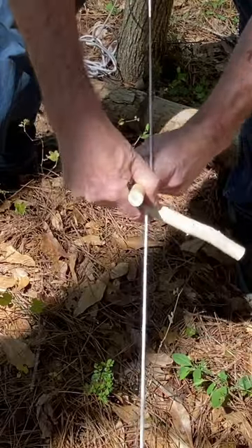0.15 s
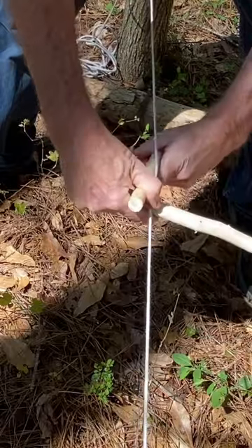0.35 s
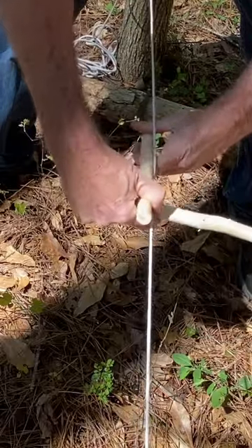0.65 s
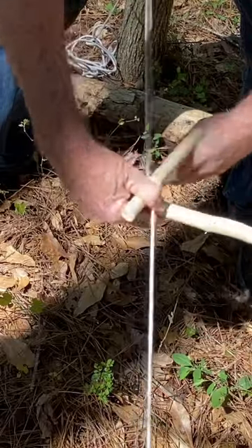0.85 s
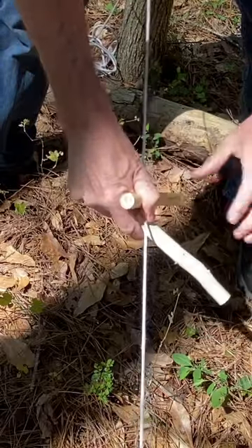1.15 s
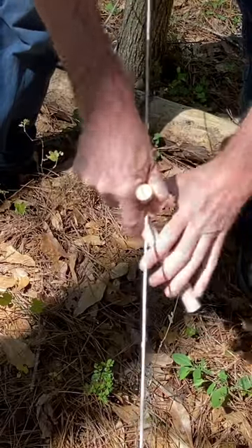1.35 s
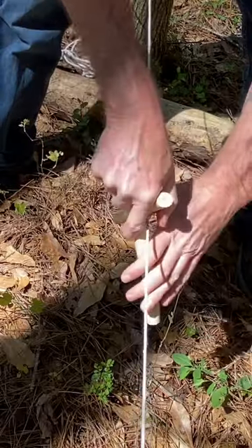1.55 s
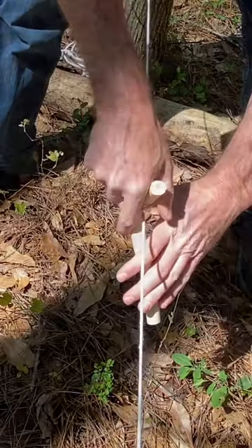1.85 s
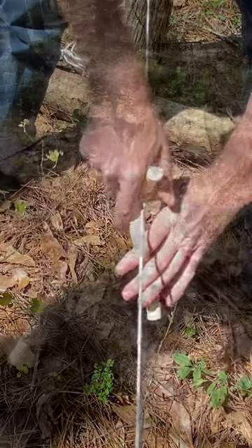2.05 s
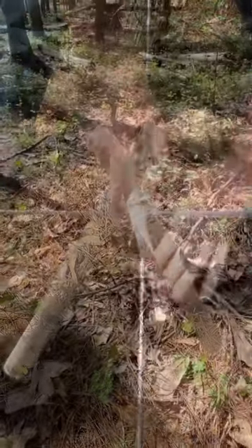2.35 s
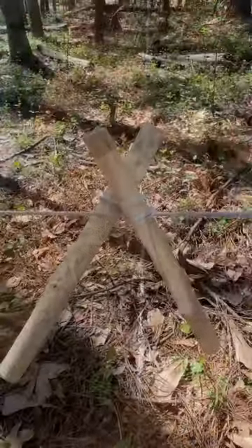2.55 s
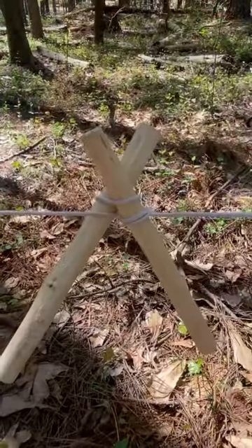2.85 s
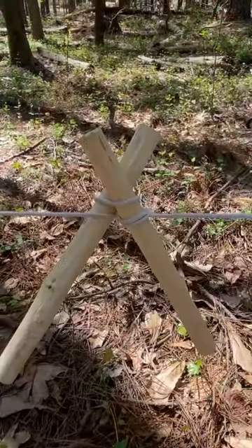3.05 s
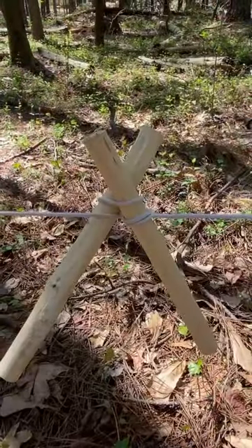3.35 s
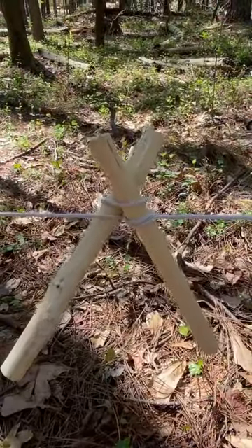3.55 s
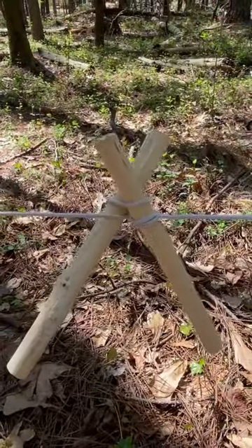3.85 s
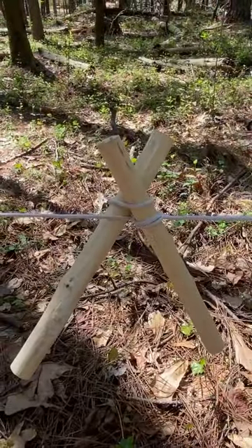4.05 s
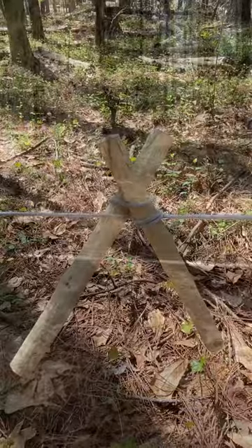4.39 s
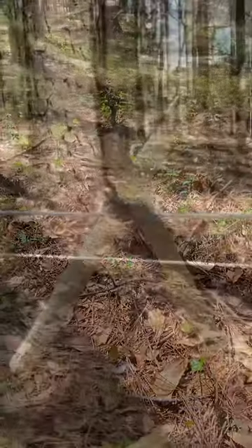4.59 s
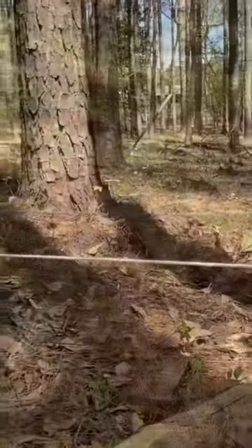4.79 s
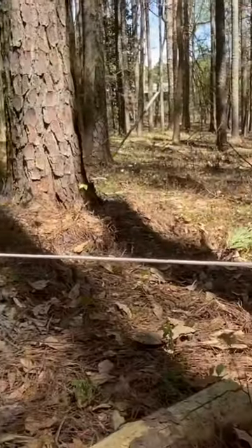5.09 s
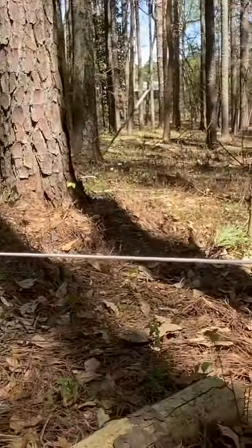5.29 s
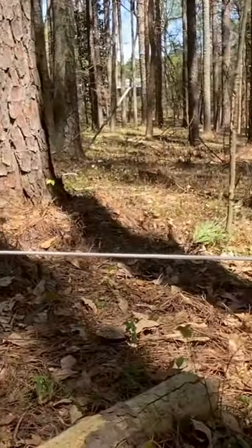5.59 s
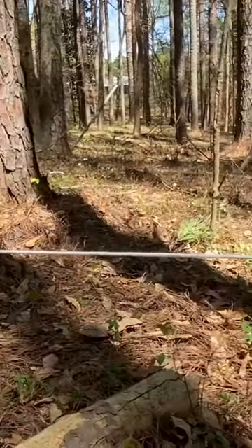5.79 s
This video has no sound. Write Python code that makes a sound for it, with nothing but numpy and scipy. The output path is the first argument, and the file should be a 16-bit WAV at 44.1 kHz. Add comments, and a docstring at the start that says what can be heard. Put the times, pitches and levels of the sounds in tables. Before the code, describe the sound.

A wooden toggle knocks sharply once on a taut rope in quiet pine woods while an engine hum fades and birds trill and chip.

```python
"""A quiet pine wood, heard by two spaced microphones: close by, hands work a wooden toggle on a taut rope.
The sticks knock sharply once, among lighter contacts: decaying wood modes plus a noise crack.
A distant engine, two sagging tones, fades into a low rumble; dry leaves tick and rustle as shaped noise.
One bird to the right sings a quick rolling phrase, another gives thin rising chips, others call deeper in.
Birds are gliding sine notes; the trunks scatter them as separate echoes and a diffuse tail."""
import sys
import numpy as np
from scipy import signal
from scipy.fft import rfft, irfft, next_fast_len
from scipy.io import wavfile
from scipy.ndimage import map_coordinates

SR = 44100
rng = np.random.default_rng(int(sys.argv[2]) if len(sys.argv) > 2 else 0)


def output_pcm(signal):
    """Save a mono or channel-first signal as 16-bit PCM at the path in sys.argv[1].

    Samples are clipped to [-1, 1] before scaling.
    """
    pcm = np.clip(np.atleast_2d(signal).T, -1, 1) * 32767
    wavfile.write(sys.argv[1], SR, np.round(pcm).astype(np.int16))


N = 261405

# Slow level shared by the rush of the wood and the rumble under it: (time [s], level [dB])
AIR_LEVEL = [(0.0, -58), (0.79, -59.5), (1.75, -57.5), (2.36, -66.5), (2.61, -67), (3.02, -66.5),
             (4.39, -69), (5.18, -62), (5.93, -62)]
# Noise spectra, relative density: (frequency [Hz], level [dB])
RUMBLE_SPECTRUM = [(20, -49), (32, -13.5), (46, -0.5), (60, 5.5), (80, 1), (105, -4.5), (135, -9),
                   (165, -17), (240, -25), (400, -34.5), (800, -70)]
RUSH_SPECTRUM = [(100, 0.5), (250, -3), (400, -3.5), (600, 0.5), (870, 5.5), (1200, 2), (1600, -6),
                 (2200, -14), (3200, -23), (5000, -39), (12000, -100)]
LEAF_SPECTRUM = [(800, -8), (2200, -17), (4500, 7.5), (8000, 3.5), (9300, -2), (12000, 0), (13200, -54),
                 (16000, -62)]
ROPE_SPECTRUM = [(500, 0), (2000, 6), (5000, -4.5), (7700, 4.5), (9200, -11.5), (11000, 4.5), (13000, -14),
                 (15000, -7), (16500, -33)]
TWIG_SPECTRUM = [(300, -58.5), (1200, 1), (2500, 13.5), (4300, 12), (6000, 11.5), (7800, 14.5),
                 (11000, 8.5), (16000, -55)]
# Likeness of the two microphones in diffuse sound: (frequency [Hz], correlation [-1 to 1])
MIC_LIKENESS = [(90, 0.93), (200, 0.52), (320, 0.22), (500, -0.18), (900, -0.31), (1400, -0.4),
                (2200, 0.16), (7000, 0.16)]
# Decay among the trunks: (frequency [Hz], time to fall 60 dB [s])
TRUNK_DECAY = [(500, 0.23), (2600, 1), (4500, 0.64), (7500, 0.47), (12000, 0.25)]
# Dry leaves pressed on the ground: (time [s], bell width [s], relative level [dB])
RUSTLES = [(2.42, 0.44, -75.5), (3.13, 0.078, -76), (3.68, 0.18, -78.5), (5.18, 0.25, -76.5),
           (5.8, 0.36, -77.5)]
# The engine's tones: (pitch at the start [Hz], relative level [dB], brief swells and dips),
# the last a list of (time [s], bell width [s], change [dB])
ENGINE_TONES = [(82.2, -39, [(.08, 0.51, 3.5), (.55, .25, -10), (1.65, 0.15, 5)]),
                (131.5, -40, [(.36, .15, -5), (1.563, 0.12, -17)])]
# Whistles deeper in the wood, before the loss over distance:
# (time [s], length [s], start [Hz], middle [Hz], end [Hz], level [dB])
FAR_CALLS = [(.53, .36, 2610, 2610, 2600, -73), (.9, .62, 2600, 2590, 2580, -68),
             (.915, .035, 3100, 3600, 4300, -71), (1.19, .032, 3100, 3750, 4600, -73),
             (2.55, .15, 5900, 5800, 5750, -78), (3.23, .115, 3300, 2730, 2480, -75.5),
             (3.755, .115, 3300, 2730, 2480, -78), (3.772, .07, 2030, 1930, 1850, -71)]
# Chips: (time [s], length [s], relative level [dB], left over right [dB])
CHIPS = [(2.492, 0.045, -59, 6), (3.351, .052, -54, 6), (3.754, 0.063, -60.5, 1), (4.274, 0.051, -61, 11),
         (4.849, 0.031, -68, 13), (5.41, 0.041, -56.5, 16)]
# Pitch of a chip, before small random bends: (start [Hz], middle [Hz], end [Hz])
CHIP_PITCHES = (6150, 7480, 8150)
# Syllables of the rolling phrase, before small random bends: (time into the phrase [s], length [s],
# start [Hz], middle [Hz], end [Hz], relative level [dB], loss by the end of the song [dB])
PHRASE = [(-.028, .009, 4100, 5010, 6000, -14.5, 19), (.001, .027, 5246, 3750, 2640, -5.5, 24.5),
          (0.072, .027, 1757, 1980, 2330, -19, 6.5), (.106, .036, 2934, 3054, 3780, -4, 24.5),
          (.177, 0.067, 2285, 2505, 2590, -10, 25.5)]
# Clearest ticks of twigs, rope and dry leaves:
# (time [s], relative level [dB], left over right [dB], tilt [dB per octave])
TICKS = [(0.036, -35, 3, -5.5), (0.3765, -37, 4.5, -3), (0.44, -44.5, -0.5, 48), (.511, -47, 5, -2),
         (2.401, -50.5, -14, 34), (2.492, -45.5, -4, 23), (2.7663, -46.5, 0, 1), (3.123, -41.5, -1, 2.5),
         (3.712, -42.5, -1, -0.5), (4.005, -49.5, 4, -2), (4.218, -60, 6, 6), (4.566, -44.5, 0, -7.5),
         (5.1272, -43, 3, -6), (5.159, -40.5, -1, -9.5), (5.237, -40.5, 4, -10.5), (5.439, -47, -3, -8),
         (5.7153, -45, 15, -1), (5.829, -52, 15, -5.5)]
# Rope sliding through the hands: (time [s], bell width [s], relative level [dB])
SLIDES = [(.167, 0.037, -58.5), (.2, 0.088, -63.5), (.6, 0.096, -68.5), (.796, 0.029, -49),
          (.964, .027, -61.5), (1.304, 0.041, -71), (1.45, 0.049, -70), (1.705, .015, -67)]
# Stick against stick: (time [s], relative peak level [dB], low-pass cutoff [Hz])
KNOCKS = [(0.1877, -36.5, 700), (0.7856, -22, 7500), (0.7915, -34, 2500), (0.7963, -32.5, 9000),
          (0.7996, -25, 8100), (0.8105, -29.5, 1000), (1.0835, -34.5, 2840), (4.686, -63, 920)]
# The sticks' modes: (frequency [Hz], relative level [dB], time to fall 60 dB [s])
WOOD_MODES = [(290, -8, 0.028), (440, -1, 0.014), (886, -5, 0.0098), (1216, -4, 0.078), (1354, 6.5, 0.024),
              (1722, 6, 0.017), (2580, -11, 0.036), (2930, 3.5, 0.016), (3850, 0, 0.016),
              (4920, 17.5, 0.0013), (5260, 0.5, 0.007), (7600, -7, 0.025)]

TOP_HZ = 15900
RUSH_DB = 5  # over the shared air level
RUMBLE_DB, RUMBLE_FOLLOWS = -50, 0.94  # mean level, and the share of the slow swing that it follows
HISS_DB = -85  # leaves at rest
# the engine slows ever faster (share of its speed per s squared) and recedes; from GONE_S on it fades quickly
SLOWING, RECEDE_DB_PER_S, GONE_S, GONE_DB_PER_S = 0.01236, 5.5, 2.275, 35.5
# every bird note swells and sinks: its peak (share of its length), start and end below the peak (dB)
NOTE_PEAK, NOTE_START_DB, NOTE_END_DB = 0.34, -2, -6.5
CHIP_START_DB = -15.5  # a chip begins more softly than other notes
QUAVER = .012  # quick unsteadiness of a bird's pitch (share)
PHRASE_S = .2912  # from one phrase to the next
WARM_UP_DB = 12.5  # a song starts soft, by this much
NEAR_SONG_S, NEAR_SONG_DB, NEAR_LENGTH_S, NEAR_WARM_UP_S = 1.218, -41.5, 1.52, 0.088
FAR_SONG_S, FAR_SONG_DB, FAR_LENGTH_S, FAR_WARM_UP_S = 4.205, -60, 1.6, .36
REBOUND_S, REBOUND_DB = 0.0041, -9  # each knock touches once more, softly


def amp(db):
    """Decibels to gain."""
    return 10 ** (np.asarray(db) / 20)


def unit(x):
    """Scale to rms 1."""
    return x / np.sqrt(np.mean(x ** 2) + 1e-20)


def along(points, hz):
    """Read (frequency [Hz], value) points on a log frequency axis."""
    f, v = np.transpose(points)
    return np.interp(np.log(hz + 1), np.log(f + 1), v)


def curves(rows):
    """One value per sample for each column after the time."""
    s, *cols = np.transpose(rows)
    return [np.interp(np.arange(N) / SR, s, c) for c in cols]


def wobble(rate, count=N):
    """A smooth random curve, rate knots a second."""
    knots = rng.standard_normal(int(count * rate / SR) + 4)
    return map_coordinates(knots, [np.arange(count) * rate / SR])


def bell(s, length):
    """A smooth rise to 1 and back around time s."""
    return np.exp(-2 * ((np.arange(N) / SR - s) / length) ** 2)


def swells(rows):
    """Bell-shaped rises of level from (time [s], bell width [s], level [dB]) rows."""
    return sum(amp(db) * bell(s, length) for s, length, db in rows)


def filtered(x, response):
    """Shape x by a response of frequency."""
    n = x.shape[-1]
    m = next_fast_len(n + SR // 4)
    hz = np.fft.rfftfreq(m, 1 / SR)
    return irfft(rfft(x, m) * response(hz), m)[..., :n]


def pan(db):
    """Left and right gains for a level difference, left over right."""
    return amp(np.array([[db], [-db]]) / 2)


def add(track, s, sound):
    """Mix a sound into a track at time s."""
    part = track[..., max(0, round(s * SR)):][..., :sound.shape[-1]]
    part += sound[..., :part.shape[-1]]


def noise(spectrum, count=N):
    """Diffuse stereo noise of rms 1, as two spaced microphones hear it."""
    def mid_side_gains(hz):
        turn = np.arccos(np.clip(along(MIC_LIKENESS, hz), -1, 1)) / 2
        return amp(along(spectrum, hz)) * [np.cos(turn), np.sin(turn)]

    mid, side = filtered(rng.standard_normal((2, count)), mid_side_gains)
    return unit(np.array([mid + side, mid - side]))


def arrive(x, lead):
    """Direct sound that reaches the left microphone lead seconds before the right."""
    sides = np.array([[1], [-1]])
    return filtered(x, lambda hz: np.exp(1j * np.pi * hz * lead * sides))


def near_trunks(x, echo_db, count=5):
    """A few separate echoes from the nearest trees, at other delays for each microphone."""
    out = np.zeros((2, N))
    for side in out:
        for delay in rng.uniform(0.006, 0.021, count):
            add(side, delay, amp(echo_db) * x)
    return out


def forest(x, wet_db, build=0.0009):
    """The trunks' diffuse answer: decaying noise, different at each microphone, building over build seconds."""
    hz, t, z = signal.stft(rng.standard_normal((2, SR)), SR, nperseg=256)
    decay = amp(-60 * t / along(TRUNK_DECAY, hz)[:, None])
    onset = 1 - np.exp(-t / build)
    tail = signal.istft(z * decay * onset, SR, nperseg=256)[1]
    tail = tail / np.linalg.norm(tail[0])
    return amp(wet_db) * signal.fftconvolve(x[None], tail, axes=1)[:, :N]


def background():
    """Far rumble, the soft rush of the wood and a faint crackling hiss of leaves, all shaped noise."""
    air_db, = curves(AIR_LEVEL)
    rumble_db = RUMBLE_DB + RUMBLE_FOLLOWS * (air_db - air_db.mean()) + 0.82 * wobble(9)
    rumble = amp(rumble_db) * noise(RUMBLE_SPECTRUM) * pan(4.4)
    rush = amp(air_db + RUSH_DB + 1.0 * wobble(7)) * noise(RUSH_SPECTRUM) * pan(0.8)
    hiss = amp(HISS_DB + 1.4 * wobble(25) + 2.9 * wobble(350)) * noise(LEAF_SPECTRUM)
    return rumble + rush + hiss


def engine(waver_db=2):
    """Two low tones that sag and fade together, wavering on their long way through the wood."""
    tones, t = np.zeros(N), np.arange(N) / SR
    speed = 1 - SLOWING * t ** 2
    fade_db = RECEDE_DB_PER_S * t + GONE_DB_PER_S * np.maximum(t - GONE_S, 0)
    for hz, db, changes in ENGINE_TONES:
        swell_db = sum(change_db * bell(s, length) for s, length, change_db in changes)
        phase = 2 * np.pi * np.cumsum(hz * speed) / SR + 0.6 * wobble(14)
        level = db - fade_db + swell_db + waver_db * wobble(10.7)
        tones += np.sqrt(2) * amp(level) * np.sin(phase)
    return arrive(tones, lead=.0004) * pan(2)


def litter(count=170, spread_db=4, life=0.00077):
    """Dry leaves and needles settle in many faint decaying snaps, louder where they are pressed."""
    stir = amp(HISS_DB) + swells(RUSTLES)
    snaps = np.zeros(N)
    at = rng.integers(0, N, count)
    extra_db = np.minimum(spread_db * rng.standard_exponential(count), 12)
    snaps[at] = stir[at] * amp(extra_db)
    bursts = signal.lfilter([1], [1, -np.exp(-1 / (life * SR))], snaps)
    return amp(5.5) * bursts * noise(TWIG_SPECTRUM)


def rustle():
    """Dry leaves crushed briefly: noise with a fast uneven level gives a grainy crackle."""
    grain = unit(amp(2.9 * wobble(300)))
    return swells(RUSTLES) * grain * noise(LEAF_SPECTRUM)


def add_whistle(track, s, length, pitches_hz, db, quaver=0, start_db=NOTE_START_DB, edge=0.00074):
    """A pure note that glides through its start, middle and end pitch as it swells and sinks."""
    u = np.linspace(0, 1, max(3, round(length * SR)))
    glide = np.polyfit([0, .5, 1], pitches_hz, 2)
    hz = np.polyval(glide, u) * (1 + quaver * wobble(219, count=len(u)))
    level = db + np.interp(u, [0, NOTE_PEAK, 1], [start_db, 0, NOTE_END_DB])
    ends = np.clip(np.minimum(u, 1 - u) * length / edge, 0, 1)
    add(track, s, ends * amp(level) * np.sin(2 * np.pi * np.cumsum(hz) / SR))


def sing(start, db, song_s, warm_up_s, waver=0.008):
    """One phrase repeated, never quite alike, under one arch of loudness."""
    voice = np.zeros(N)
    for phrase_s in np.arange(0, song_s, PHRASE_S):
        for offset, length, *pitches_hz, level, tiring_db in PHRASE:
            bend = 1 + waver * rng.standard_normal(len(pitches_hz))
            age = phrase_s + offset
            warm_up_db = -WARM_UP_DB * np.exp(-age / warm_up_s)
            effort_db = warm_up_db - tiring_db * (age / song_s) ** 4
            if age < song_s:
                add_whistle(voice, start + age, length, bend * pitches_hz, db + level + effort_db, QUAVER)
    return voice * amp(3 * wobble(260))


def far_birds(dull_hz=3300):
    """Distant whistles and a second singer, mostly echo, whose top notes are lost among the trees."""
    calls = np.zeros(N)
    for s, length, *pitches_hz, db in FAR_CALLS:
        add_whistle(calls, s, length, pitches_hz, db)
    calls = calls * amp(3.2 * wobble(70))
    song = sing(FAR_SONG_S, FAR_SONG_DB, FAR_LENGTH_S, FAR_WARM_UP_S)
    singer = filtered(song, lambda hz: 1 / np.sqrt(1 + (hz / dull_hz) ** 8))
    direct = amp(-3) * calls + amp(-7) * singer
    echoes = near_trunks(singer, echo_db=-11)
    return direct + echoes + forest(calls, wet_db=-4) + forest(singer, wet_db=-1.5, build=0.014)


def chipping_bird(waver=0.0072):
    """Thin upward flicks of pitch with a slightly hoarse flutter of level."""
    out, voice = np.zeros((2, N)), np.zeros(N)
    flutter = amp(2.4 * wobble(380))
    for s, length, db, side_db in CHIPS:
        note = np.zeros(N)
        pitches_hz = CHIP_PITCHES * (1 + waver * rng.standard_normal(len(CHIP_PITCHES)))
        add_whistle(note, s, length, pitches_hz, db, QUAVER / 2, CHIP_START_DB)
        out += note * flutter * pan(side_db)
        voice += note * flutter
    return arrive(out, lead=.00002) + near_trunks(voice, echo_db=-15.5) + forest(voice, wet_db=0)


def songbird():
    """The near singer sits a little to the right; its song swells and dies away."""
    voice = sing(NEAR_SONG_S, NEAR_SONG_DB, NEAR_LENGTH_S, NEAR_WARM_UP_S)
    direct = arrive(voice, lead=-.00007) * pan(-4)
    echoes = near_trunks(voice, echo_db=-15)
    return direct + echoes + forest(voice, wet_db=-3.5)


def ticks(life=0.0044):
    """Tiny dry snaps: tilted noise that dies within milliseconds, with almost no ring."""
    out, t = np.zeros((2, N)), np.arange(SR // 25) / SR
    for s, db, side_db, tilt in TICKS:
        spectrum = [(hz, level + tilt * np.log2(hz)) for hz, level in TWIG_SPECTRUM]
        snap = noise(spectrum, count=len(t)) * np.exp(-t / life)
        add(out, s, amp(db - 15.5) * snap * pan(side_db))
    return out + forest(out.mean(0), wet_db=-25)


def rope():
    """Fibres catch and slip: noise in short swells with a fast uneven level."""
    return swells(SLIDES) * amp(-2.5 + 3.0 * wobble(400)) * noise(ROPE_SPECTRUM)


def sticks(crack_t60=0.011, crack_db=5):
    """Each contact rings the wood's modes briefly under a noise crack, dulled by its own low-pass."""
    out, t = np.zeros((2, N)), np.arange(SR // 8) / SR
    rebounds = [(s + REBOUND_S, db + REBOUND_DB, cutoff_hz) for s, db, cutoff_hz in KNOCKS]
    for s, db, cutoff_hz in [*KNOCKS, *rebounds]:
        chance = rng.standard_normal((len(WOOD_MODES), 2, 2, 1))  # strength and phase at each microphone
        ring = np.zeros((2, len(t)))
        for (hz, level, t60), (size, phase) in zip(WOOD_MODES, chance):
            ring += amp(level + 2 * size - 60 * t / t60) * np.sin(2 * np.pi * hz * t + phase)
        crack = amp(crack_db - 60 * t / crack_t60) * rng.standard_normal((2, len(t)))
        low_pass = signal.butter(1, min(cutoff_hz, SR / 3), fs=SR)
        blow = signal.lfilter(*low_pass, ring + crack)
        add(out, s, amp(db) * blow / np.abs(blow).max())
    return out * pan(0.98) + forest(out.mean(0), wet_db=-21.5)


def scene():
    """Everything heard in the wood, from the far rumble to the sticks at hand."""
    surroundings = background() + engine() + litter() + rustle()
    birds = far_birds() + chipping_bird() + songbird()
    handling = ticks() + rope() + sticks()
    return surroundings + birds + handling


def record(dry):
    """The microphone signal keeps nothing from the band limit upward."""
    return filtered(dry, lambda hz: hz < TOP_HZ)


dry = scene()
out = record(dry)
output_pcm(out)
```